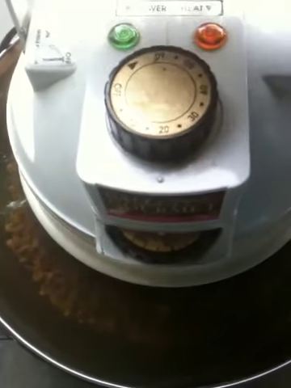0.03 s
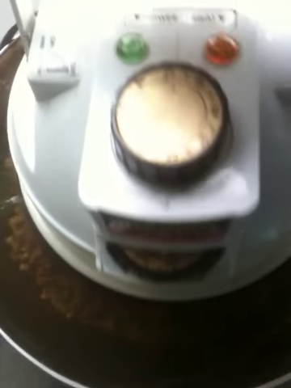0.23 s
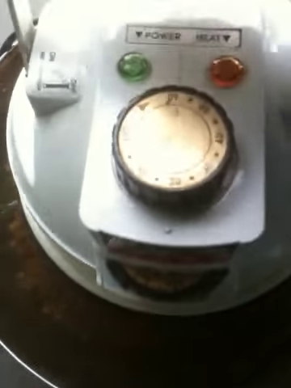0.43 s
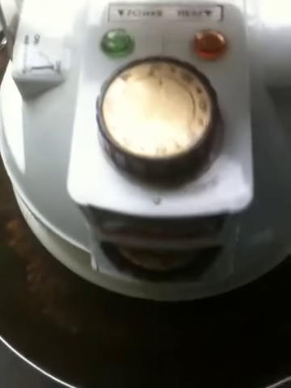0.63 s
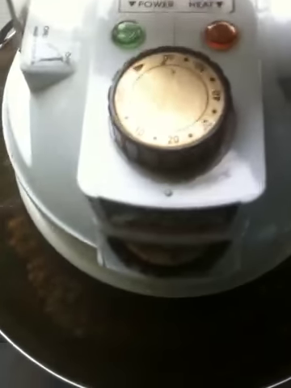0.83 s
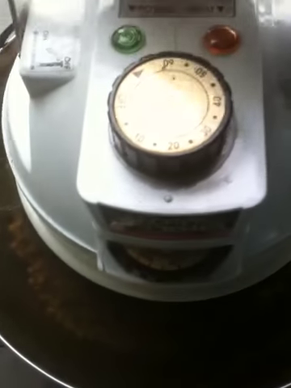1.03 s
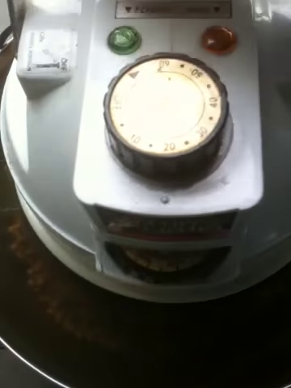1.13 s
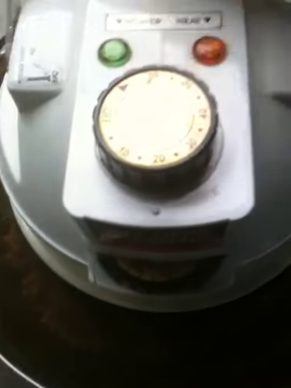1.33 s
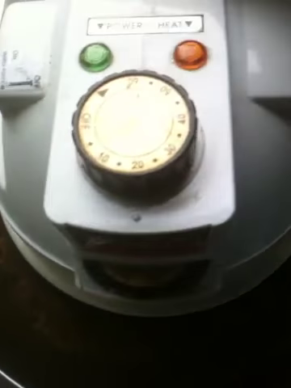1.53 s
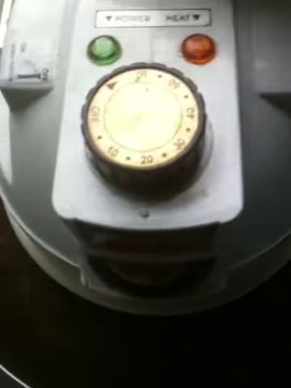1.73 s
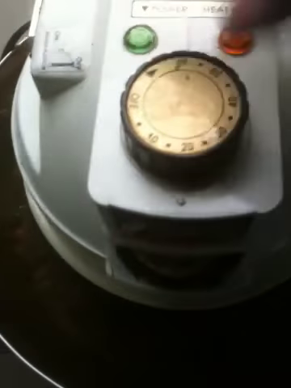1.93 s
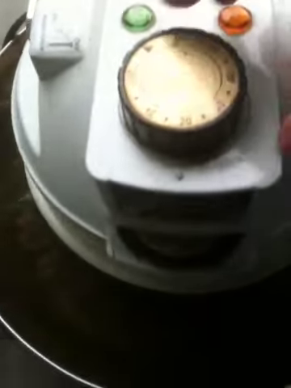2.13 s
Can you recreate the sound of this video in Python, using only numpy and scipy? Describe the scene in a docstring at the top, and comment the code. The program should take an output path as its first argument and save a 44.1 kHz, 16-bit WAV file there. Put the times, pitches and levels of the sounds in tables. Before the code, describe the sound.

Close up indoors, coffee beans are stirred around a roaster's metal pan while its fan hums. A bean cracks sharply with a short metallic ring, a few fainter pops follow, and a second sharp crack comes near the end.

```python
"""A countertop coffee roaster, close up. From the start its fan hums in the lid, while an arm stirs
beans that rustle and tick against the metal pan. At about 0.3 s a bean pops sharply and sets the pan
and lid ringing. Three softer pops follow, then a second sharp one at about 1.6 s. The fan and the
stirring carry on to the end."""
import sys
import numpy as np
from scipy import signal
from scipy.fft import rfft, irfft
from scipy.io import wavfile

SR = 44100
rng = np.random.default_rng(int(sys.argv[2]) if len(sys.argv) > 2 else 0)


def unload_wav(signal):
    """Save mono or channel-first audio to the path in sys.argv[1] as 16-bit WAV at rate SR, clipped to [-1, 1]."""
    wavfile.write(
        sys.argv[1],
        SR,
        np.round(np.clip(np.atleast_2d(signal).T, -1, 1) * 32767).astype(np.int16),
    )


N = 97020
T = np.arange(N) / SR

# Levels are relative. A "colour" says how strong each pitch is. "T60" is the time to fade by 60 dB.
# The fan's rushing air: (frequency [Hz], level [dB])
FAN_COLOUR = [(25,-63),(100,-27.5),(125,-16.5),(170,-8.5),(220,2),(275,2),(335,3),(400,-9.5),(600,-11),(900,-7.5),(1400,-6),(3000,-9.5),(8000,-17.5),(15000,-47)]
# Faint fan tones: (pitch [Hz], level [dB], filter width [Hz])
FAN_TONES = [(258.7,-62.5,24),(329.6,-67,39),(1302.4,-69.5,35),(4074,-63.5,34)]
# The low hum swells and sinks: (time [s], boost [dB])
HUM_SWELL = [(0,-2.5),(.28,0.5),(.55,1),(.86,6),(1.1,2),(1.45,0),(1.75,2.5),(2.2,-2)]
# The rustle of sliding beans: (time [s], level [dB])
RUSTLE_LEVELS = [(0,-40.5),(.19,-43.5),(.25,-37),(.3,-42.5),(.44,-41),(.5,-49),(.6,-42),(.75,-45),(.778,-64),(.83,-42.5),(1.02,-41.5),(1.13,-47),(1.28,-39),(1.39,-43),(1.53,-44.5),(1.58,-39),(1.66,-40),(1.85,-43.5),(2.2,-43.5)]
# The colour of sliding beans: (frequency [Hz], level [dB])
RUSTLE_COLOUR = [(60,-28),(300,-9),(600,-13),(1300,0),(2500,3),(3400,-2),(5000,1.5),(7800,4),(10400,-4.5),(12000,-8.5),(15500,-29)]
# Pitches that the pan strengthens: (pitch [Hz], width [Hz], boost [dB])
PAN_RESONANCES = [(866,67,10.5),(1293,89,10),(2210,41,7.5),(2670,54,6.5),(3020,45,8.5),(4210,165,8),(5400,140,2.5),(7000,200,1),(10240,200,3)]
# Beans hit the pan: (time [s], level [dB], hold [s], high fizz level [dB], shell pitch [Hz])
TUMBLES = [(.1173,-42,.004,-59,3000), (.1598,-42,.009,-56,7700), (.2171,-39,.008,-55,7700),
           (.3294,-36,.008,-45,5700), (.3902,-38,.008,-53,6250), (.5305,-39,.005,-60,6250),
           (.5983,-41,.005,-60,4150), (.617,-45,.004,-75,1300), (.66,-41,.005,-59,4200),
           (.6953,-40,.005,-61,6200), (.7284,-42,.004,-61,1500), (.7536,-42,.004,-71,3900),
           (.791,-42,.005,-65,5400), (.8336,-41,.009,-59,6700), (.8531,-41,.005,-62,4150),
           (.9784,-34,.004,-50,7300), (1.0428,-42,.006,-62,4300), (1.097,-37,.007,-54,5150),
           (1.1498,-40,.004,-57,6700), (1.1641,-41,.004,-70,5500), (1.2637,-38,.005,-57,6950),
           (1.281,-42,.004,-60,1500), (1.306,-38.5,.004,-46,9000), (1.4224,-41,.004,-54,3000),
           (1.4712,-41,.004,-53,6200), (1.4872,-41,.005,-60,3050), (1.5046,-39,.006,-56,4200),
           (1.5234,-41,.006,-64,900), (1.5885,-34,.006,-50,4200), (1.8143,-44,.004,-58,8000),
           (1.9046,-33,.004,-51,5100), (1.9339,-39,.005,-57,3900), (2.0233,-40,.004,-56,4200),
           (2.0341,-41,.005,-55,7600)]
# The colour of their rattle: (frequency [Hz], level [dB])
TUMBLE_COLOUR = [(60,-11.5),(300,3),(700,-11.5),(1300,-3),(3400,-4.5),(4500,-1.5),(8000,2),(10400,-3),(12000,-12),(15500,-28)]
# Beans pop: (time [s], crack [dB], hold [s], snap [dB], knock [dB], lower knock [Hz],
# upper knock [Hz], thump [dB], thump pitch [Hz], ring [dB])
POPS = [(.3179,-24,.0048,-34,-32,1000,1790,-23.5,196,-33.5), (.755,-45,.0068,-62,-47,880,1500,-41,285,-66),
        (.9445,-44,.005,-55,-33,900,1330,-46,290,-66), (1.3295,-49,.005,-44,-46,2200,2500,-88,300,-75),
        (1.5974,-39,.0018,-24,-25,475,700,-31,270,-42.5)]
# A pop's crack: (frequency [Hz], level [dB])
CRACK_COLOUR = [(100,-34),(400,-19.5),(590,2.5),(740,-6),(920,1.5),(1300,-5),(1900,4),(2200,-1),(2800,-8),(4500,-9),(6500,-13),(15500,-27)]
# Its bright snap: (frequency [Hz], level [dB])
SNAP_COLOUR = [(100,-48),(1200,-8),(1900,11),(3000,1.5),(7000,1.5),(11000,-9),(15500,-20)]
# Its noisy tail: (frequency [Hz], level [dB])
TAIL_COLOUR = [(40,-33),(100,-32),(160,-1),(300,7.5),(430,-9.5),(1100,-8.5),(3100,-8),(4000,-31),(15000,-69)]
# The ringing pan and lid: (pitch [Hz], level [dB], T60 [s])
RING_NOTES = [(243,7,.15),(264,4,.54),(328,4.5,.2),(533,-5,.21),(727,-8,.3),(1105,-2,.15),(1157,-1,.23),
              (1520,-7,.23),(1770,-6.5,.25),(2659,-4,.21),(2795,-9,.3),(2900,-10,.27),(3230,-8,.2)]

FAN_DB, HUM_TOP_HZ = -50, 486
BEANS_DB, RUSTLE_DB = -1, -8
SLIDE_CONTACTS_PER_S, TUMBLE_CONTACTS_PER_S, CONTACT_SPREAD_DB = 7600, 10000, 7.5
TICKS_PER_S, TICK_DB, TICK_SPREAD_DB, TICK_SHELL_DB = 65, -49.5, 3.5, -8
SHELL_DB, SHELL_WIDTH_HZ, SHELL_RANGE_HZ = -6, 700, (1300, 9000)
TUMBLE_RISE_S, BEAN_T60_S = .0008, .017
FIZZ_DB, FIZZ_LOW_HZ = 2, 10500
UPPER_KNOCK_DB, KNOCK_LOW_HZ = -.5, 400
THUMP_RISE_CYCLES, THUMP_SHARPNESS = 2.7, 6.8
TAIL_DB, RING_RISE_S = 2.5, .01
ROOM_DB, CUTOFF_HZ = -14, 15950


def from_db(db):
    """Turn decibels into a number to multiply by."""
    return 10 ** (np.asarray(db) / 20)


def rms_one(x):
    """Scale a signal to an average power of one."""
    return x / np.sqrt(np.mean(x ** 2) + 1e-20)


def curve(rows):
    """Join (time, value) points with straight lines."""
    return np.interp(T, *np.transpose(rows))


def cut_lows(x, hz, order=2):
    """Turn down everything below a pitch."""
    return signal.sosfilt(signal.butter(order, hz, "high", fs=SR, output="sos"), x)


def colour(x, points):
    """Make some pitches stronger and others weaker, following a colour table."""
    size = 4096
    hz, db = np.transpose(points)
    grid_hz = np.arange(size // 2 + 1) * SR / size
    gain = from_db(np.interp(np.log(grid_hz + 1), np.log(hz), db))
    # These steps keep the filter from sounding before a hit arrives.
    cepstrum = irfft(np.log(rms_one(gain)))
    cepstrum[1:size // 2] *= 2
    cepstrum[size // 2 + 1:] = 0
    response = irfft(np.exp(rfft(cepstrum)))
    return signal.fftconvolve(x, response)[:N]


def resonate(x, hz, width_hz):
    """Keep the sound near one pitch; a narrower band rings longer."""
    r = np.exp(-np.pi * width_hz / SR)
    feedback = [1, -2 * r * np.cos(2 * np.pi * hz / SR), r * r]
    return signal.lfilter(np.array([1, 0, -1]) * (1 - r * r) / 2, feedback, x + 1e-18)


def burst(start, hold, t60):
    """A loudness shape that jumps up, holds, then fades (all in seconds)."""
    return (T >= start) * np.exp(-np.log(1000) * np.clip((T - start - hold) / t60, 0, 2))


def fan():
    """Air hums in the lid and hisses over the beans, with a few unsteady tones."""
    air = from_db(FAN_DB) * colour(rng.standard_normal(N), FAN_COLOUR)
    for hz, db, width in FAN_TONES:
        band = resonate(rng.standard_normal(N), hz, width)
        air += from_db(db) * rms_one(resonate(band, hz, width))
    hum = signal.sosfiltfilt(signal.butter(2, HUM_TOP_HZ, fs=SR, output="sos"), air)
    return air + hum * (from_db(curve(HUM_SWELL)) - 1)


def contacts(per_s):
    """Beans touch at random moments, making tiny clicks of uneven size."""
    sizes = from_db(CONTACT_SPREAD_DB * (2 * rng.random(N) - 1)) * rng.choice([-1, 1], N)
    return rms_one(sizes * (rng.random(N) < per_s / SR))


def shell(x, hz):
    """Clicks make a bean's shell ring briefly."""
    return resonate(x, hz, SHELL_WIDTH_HZ) * np.sqrt(SR / (np.pi * SHELL_WIDTH_HZ))


def rustle():
    """Beans slide, with small ticks among them, each at its own pitch."""
    stir_db = curve(RUSTLE_LEVELS)
    clicks = contacts(SLIDE_CONTACTS_PER_S) * from_db(stir_db - stir_db.mean())
    gaps, sizes, pitches = rng.random((3, N))
    starts = np.cumsum(2 * gaps) / TICKS_PER_S
    power = from_db(stir_db.mean() + RUSTLE_DB) ** 2
    ticks = np.zeros(N)
    for start, size, pitch in zip(starts[starts < T[-1]], sizes, pitches):
        tick_db = TICK_DB + TICK_SPREAD_DB * (2 * size - .5)
        shape = from_db(tick_db) * burst(start, hold=.003, t60=BEAN_T60_S)
        power = power + shape ** 2  # each tick also lifts the rustle
        ticks += shell(clicks * shape, np.interp(pitch, [0, 1], SHELL_RANGE_HZ))
    return colour(clicks * np.sqrt(power), RUSTLE_COLOUR) + from_db(TICK_SHELL_DB) * ticks


def pan(x):
    """The metal pan boosts its own pitches in the sound of the beans."""
    return x + sum((from_db(db) - 1) * resonate(x, hz, width) for hz, width, db in PAN_RESONANCES)


def tumbles():
    """Beans hit the pan in short clusters: a rattle, ringing shells and a high fizz."""
    lag = np.exp(-1 / (TUMBLE_RISE_S * SR))
    rattle_level, fizz_level, rings = np.zeros((3, N))
    clicks = contacts(TUMBLE_CONTACTS_PER_S)
    for start, db, hold, fizz_db, hz in TUMBLES:
        power = burst(start, hold, BEAN_T60_S) ** 2
        shape = np.sqrt(signal.lfilter([1 - lag], [1, -lag], power + 1e-18))  # softens the start
        rattle_level += from_db(db) * shape
        fizz_level += from_db(fizz_db + FIZZ_DB) * shape
        rings += from_db(db + SHELL_DB) * shell(clicks * shape, hz)
    rattle = colour(contacts(TUMBLE_CONTACTS_PER_S) * rattle_level, TUMBLE_COLOUR)
    fizz = rms_one(cut_lows(contacts(TUMBLE_CONTACTS_PER_S), FIZZ_LOW_HZ, order=4))
    return rattle + rings + fizz_level * fizz


def pops():
    """A bean pops with a crack, a snap, a two-note knock and a hollow thump; pan and lid ring."""
    crack, snap, tail, knocks, thumps, ring = np.zeros((6, N))
    for start, crack_db, hold, snap_db, knock_db, low_hz, high_hz, thump_db, thump_hz, ring_db in POPS:
        age = np.maximum(T - start, 0)
        turn = 2 * np.pi * age
        # These three are loudness shapes, filled with noise below.
        crack += from_db(crack_db) * burst(start, hold, t60=.042)
        snap += from_db(snap_db) * burst(start, hold, t60=.009)
        tail += from_db(ring_db + TAIL_DB) * burst(start, 0, t60=.38)
        knock = np.sin(turn * low_hz) + from_db(UPPER_KNOCK_DB) * np.sin(turn * high_hz)
        knocks += from_db(knock_db) * burst(start, 0, t60=.029) * knock
        progress = np.minimum(age * thump_hz / THUMP_RISE_CYCLES, 20)
        swell = (progress * np.exp(1 - progress)) ** THUMP_SHARPNESS  # loudest when progress is 1
        thumps += from_db(thump_db) * swell * np.sin(turn * thump_hz)
        rise = 1 - np.exp(-age / RING_RISE_S)
        for hz, db, t60 in RING_NOTES:
            ring += from_db(ring_db + db) * burst(start, 0, t60) * rise * np.sin(turn * hz)
    layers = (crack, CRACK_COLOUR), (snap, SNAP_COLOUR), (tail, TAIL_COLOUR)
    noise = sum(colour(shape * rng.standard_normal(N), points) for shape, points in layers)
    return noise + cut_lows(knocks, KNOCK_LOW_HZ) + thumps + ring


def room(x):
    """The walls of a small room send back a short blur of echoes with little bass."""
    echo = rng.standard_normal(N) * burst(start=.0028, hold=0, t60=.11)
    echoes = signal.fftconvolve(x, echo / np.linalg.norm(echo))[:N]
    return cut_lows(echoes, hz=150)


def scene():
    """Mix the fan with the beans, their pops and their echoes."""
    beans = from_db(BEANS_DB) * pan(rustle() + tumbles()) + pops()
    return (fan() + beans + from_db(ROOM_DB) * room(beans))[None]


def record(dry):
    """Cut off the very highest treble steeply."""
    return signal.sosfilt(signal.ellip(12, .1, 70, CUTOFF_HZ, fs=SR, output="sos"), dry)


dry = scene()
out = record(dry)
unload_wav(out)
```